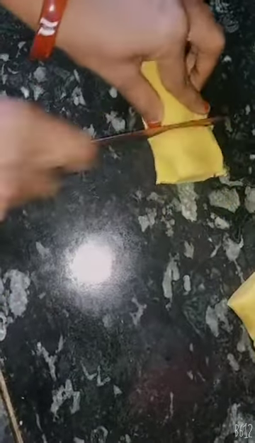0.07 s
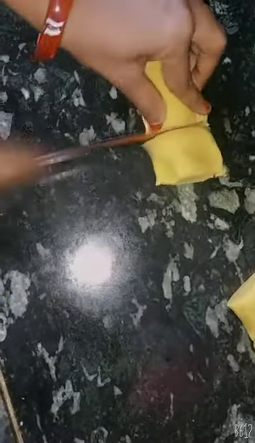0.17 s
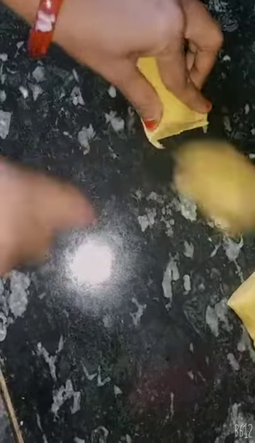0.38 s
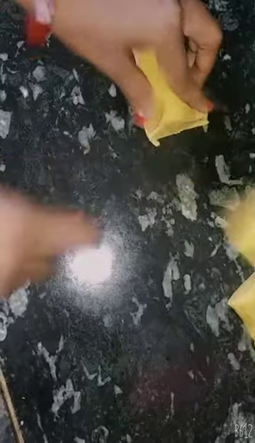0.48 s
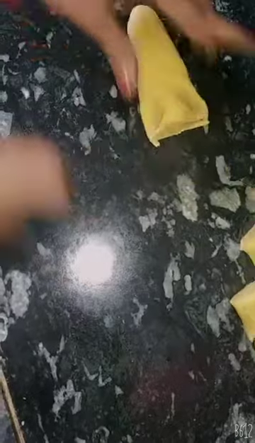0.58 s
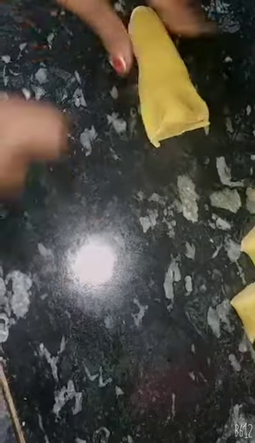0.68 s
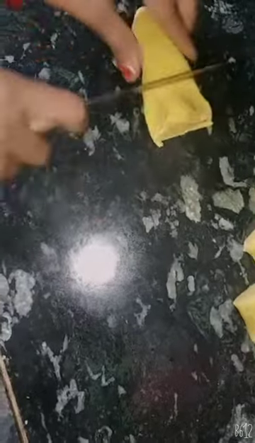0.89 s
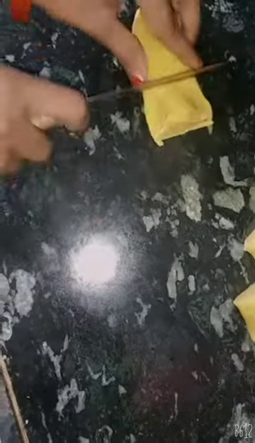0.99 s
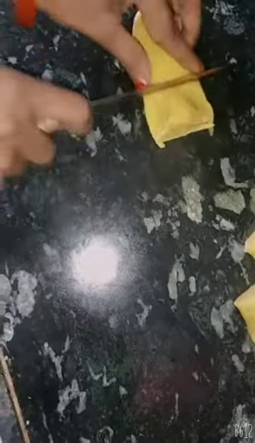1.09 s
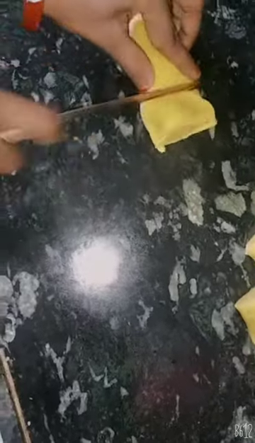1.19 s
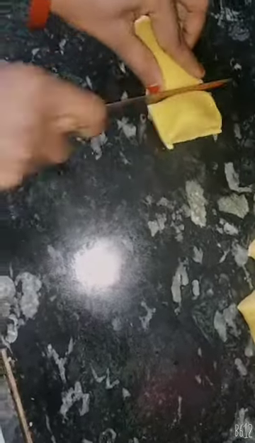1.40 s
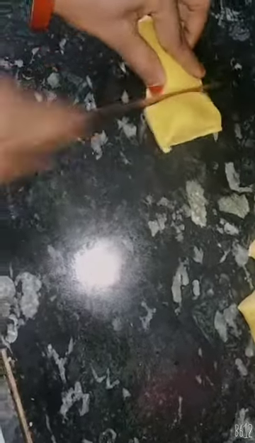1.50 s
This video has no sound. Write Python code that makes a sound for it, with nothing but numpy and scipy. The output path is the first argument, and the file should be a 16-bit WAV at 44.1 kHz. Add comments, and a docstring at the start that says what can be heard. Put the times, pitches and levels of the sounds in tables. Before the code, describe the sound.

A steel knife cutting dough scrapes hard across a stone countertop, ending in a brief squeak. After a dull bump, it scrapes lightly and ticks on the stone, close to the microphone in a small kitchen.

```python
"""Over a low, steady room noise, a steel knife cuts stiff dough on a stone countertop, close to a phone.
A faint slide dies away, then the edge is dragged hard over the stone, sticking and slipping in tiny jerks.
It ticks twice, squeals briefly with a soft knock, and rings as it lifts. A dull bump follows.
For the next cut it scrapes lightly to and fro and ticks down on the stone.
After each sound, the hard walls of the small kitchen ring on."""
import sys
import numpy as np
from scipy import signal
from scipy.fft import rfft, irfft
from scipy.io import wavfile

SR = 44100
rng = np.random.default_rng(int(sys.argv[2]) if len(sys.argv) > 2 else 0)


def store_wav(level_fs):
    """Save 16-bit WAV to argv[1]."""
    pcm = np.round(np.clip(np.atleast_2d(level_fs), -1, 1) * 32767)
    wavfile.write(sys.argv[1], SR, pcm.T.astype(np.int16))


N = 66150

# tone of the steady room noise (f/Hz, relative level/dB)
ROOM_NOISE_COLOUR = [(30, -37.5), (60, -37), (105, -28), (135, -18), (200, -5), (270, -3), (360, 0.5),
                     (460, -10.5), (550, -5.5), (680, -10.5), (790, -6), (1270, -13.5), (1640, -14),
                     (2200, -20.5), (5000, -24.5), (13800, -21)]
# light strokes (peak t/s, rise t/s, fall t/s, level/dB, treble tilt/dB per octave, treble top f/Hz)
LIGHT_STROKES = [(0.013, 0.18, 0.052, -45, -5, 14000), (1.015, .07, .12, -61.5, 6.5, 13640),
                 (1.169, 0.085, 0.015, -57, 7, 14100), (1.287, 0.028, 0.022, -36.5, 3.5, 10650),
                 (1.466, 0.057, 0.096, -43.5, 0.5, 13060)]
# tone of the edge sliding lightly (f/Hz, relative level/dB)
SLIDE_COLOUR = [(100, -48), (1000, -39.5), (2000, -26.5), (2650, -20), (3500, -15), (5000, -15),
                (6500, -9.5), (7900, -1.5), (9500, -2), (11000, -1.5), (12400, 0), (13800, -4)]
# the blade's natural tones (f/Hz, level/dB after the lift, t/s to fade by 60 dB)
BLADE_TONES = [(2115, -40.5, 0.076), (3560, -51.5, .08), (4935, -49.5, 0.18), (7630, -42.5, .15),
               (9592, -39.5, .17), (11170, -41, .17), (11630, -41.5, .12)]
# loudness of the hard stroke that parts the dough (t/s, level/dB)
DRAG_LEVELS = [(.10, -68.5), (.125, -55), (.16, -50.5), (.178, -39), (0.196, -26.5), (.206, -21),
               (.229, -18), (.242, -17), (.247, -22.5), (.251, -77)]
# tone of the edge pressed hard on stone (f/Hz, relative level/dB)
DRAG_COLOUR = [(60, -57.5), (150, -40), (400, -36.5), (900, -39), (1400, -26.5), (1850, -36.5),
               (2200, -25.5), (2650, -23), (3200, -24.5), (3700, -15.5), (5000, -19), (6400, -15.5),
               (7900, -8), (8900, -9.5), (11400, -2), (12400, -6), (13800, -6.5)]
# the edge taps the stone or catches on a grain (t/s, level/dB before colouring)
TICKS = [(0.188, -8), (0.2105, -7.5), (1.1808, -6.5), (1.1829, 5)]
# tone of a tick (f/Hz, level/dB)
TICK_COLOUR = [(60, -37.5), (400, -32), (1000, -39), (2000, -23), (2650, -21), (3500, -13.5), (4700, -20.5),
               (6300, -10), (8000, -2.5), (9300, -9), (10800, -2), (13800, -11)]
# blade tones that lock into a squeal (f/Hz, pitch wobble f/Hz, level/dB)
SQUEAL_TONES = [(4968, 300, -32), (9720, 190, -24.5), (10560, 110.7, -18), (11200, 160, -29),
                (11630, 120, -31.5)]
# soft knocks on the counter (t/s, f/Hz, level/dB, t/s to fade by 60 dB)
KNOCKS = [(0.2377, 1300, -41, .01), (0.758, 268.6, -48, 0.06)]
# how long the walls ring (f/Hz, t/s to fade by 60 dB)
WALL_RING_TIMES = [(500, 0.5), (2000, 0.41), (5000, 0.42), (8000, .35), (11000, 0.24), (14000, 0.17)]

SLIP_HZ, SLIP_JITTER = 956.8, .3  # typical slips per second, and how uneven they are
TOP_HZ = 13900  # upper limit of the treble


def undb(db):
    """Turn decibels into a number to multiply by."""
    return 10 ** (np.asarray(db) / 20)


def unit(x):
    """Scale a signal to an average (rms) strength of 1."""
    return x / np.sqrt(np.mean(x ** 2))


def clock():
    """Time of each sample in seconds."""
    return np.arange(N) / SR


def fade(start, t60):
    """Silence until the start, then a fall of 60 dB every t60 seconds."""
    age = clock() - start
    return (age >= 0) * np.exp(-np.log(1000) * np.maximum(age, 0) / t60)


def on_log_axis(hz, points):
    """Read between (f/Hz, value) points, with every octave equally wide."""
    f, v = np.array(points, float).T
    return np.interp(np.log(np.maximum(hz, 1)), np.log(f), v)


def colour(x, points, size=4096):
    """Turn low and high pitches up or down along a curve of (f/Hz, level/dB) points."""
    gain = undb(on_log_axis(np.fft.rfftfreq(size, 1 / SR), points))
    cepstrum = irfft(np.log(gain))
    cepstrum[1:size // 2] *= 2  # fold it so the filter never answers before its input
    cepstrum[size // 2 + 1:] = 0
    return signal.fftconvolve(x, irfft(np.exp(rfft(cepstrum))))[:N]


def wander(rate_hz):
    """A smooth random wobble, about 1 in size."""
    return unit(np.interp(clock() * rate_hz, np.arange(N), rng.standard_normal(N)))


def ring(start, hz, db, t60):
    """One pure tone that dies away."""
    return undb(db) * fade(start, t60) * np.sin(2 * np.pi * hz * (clock() - start))


def room_noise(level_db=-62):
    """A low, steady hush fills the room."""
    return undb(level_db) * unit(colour(rng.standard_normal(N), ROOM_NOISE_COLOUR))


def friction(points, count=4000, grit_s=.0009, grit_db=9.5, held_width_hz=70, held_db=-4.5):
    """The edge sticks and slips; each slip is a click and a puff of gritty noise that shake the blade."""
    gap, size = rng.standard_normal((count, 2)).T
    at = (np.cumsum(np.exp(SLIP_JITTER * gap)) / SLIP_HZ * SR).astype(int)
    strength = undb(.5 * np.clip(size, -2, 2))
    slips = np.bincount(at[at < N], strength[at < N], N)
    puffs = signal.lfilter([1], [1, -np.exp(-1 / (grit_s * SR))], slips)
    grit = puffs * rng.standard_normal(N)
    chatter = undb(.65 * wander(rate_hz=216.4))
    force = (unit(slips - slips.mean()) + undb(grit_db) * unit(grit)) * chatter
    # the dough damps the blade's tones while the edge slides
    steel = sum(signal.lfilter(*signal.iirpeak(hz, hz / held_width_hz, SR), force)
                for hz, _, _ in BLADE_TONES)
    return unit(colour(force + undb(held_db) * steel, points))


def light_strokes(swell_db=20.5, top_fall_db_per_octave=42):
    """The edge slides lightly over the stone in short scrapes that swell and die away."""
    hz, levels = np.array(SLIDE_COLOUR).T
    out = 0
    for peak_s, rise, fall, db, tilt_db, top_hz in LIGHT_STROKES:
        from_peak = np.maximum((peak_s - clock()) / rise, (clock() - peak_s) / fall)
        octaves = np.log2(hz / top_hz)
        tilted = levels + tilt_db * octaves - top_fall_db_per_octave * np.maximum(octaves, 0)
        out = out + friction(list(zip(hz, tilted))) * undb(db - swell_db * from_peak)
    return out


def hard_stroke():
    """The edge bites harder and harder into the stone, then leaves it."""
    times, db = np.array(DRAG_LEVELS).T
    return friction(DRAG_COLOUR) * undb(np.interp(clock(), times, db, left=-np.inf, right=-np.inf))


def ticks(spread_s=.0008875, rattle_db=-2):
    """Each tap cracks and rattles briefly; the bending blade carries the crack's treble fastest."""
    hz, out = np.fft.rfftfreq(N, 1 / SR), 0
    for start, db in TICKS:
        arrival = start + spread_s * (1 - hz / TOP_HZ)
        crack = irfft(np.exp(-2j * np.pi * np.cumsum(arrival) * SR / N), N)
        rattle = unit(rng.standard_normal(N) * fade(start, t60=.019)) / np.sqrt(N)
        out = out + undb(db) * (crack + undb(rattle_db) * rattle)
    return colour(out, TICK_COLOUR)


def squeal(full_s=.2365, rise_s=.005, hold_s=.0075, fall_s=.003):
    """Rubbing makes the blade sing for a moment, throbbing at the pace of the slips."""
    grip = np.interp(clock() - full_s, [-rise_s, 0, hold_s, hold_s + fall_s], [0, 1, 1, 0])
    slip_rate = SLIP_HZ * (1 + SLIP_JITTER * wander(SLIP_HZ))
    throb = 1 + .45 * np.sin(2 * np.pi * np.cumsum(slip_rate) / SR)
    tones = 0
    for hz, wobble_hz, db in SQUEAL_TONES:
        pitch = hz + wobble_hz * wander(SLIP_HZ)
        tones = tones + undb(db) * unit(np.sin(2 * np.pi * np.cumsum(pitch) / SR))
    return grip * throb * tones


def knocks(rise_s=.005):
    """Blade, hand and dough land on the counter with dull, cushioned bumps."""
    return sum(ring(start, hz, db, t60) * np.clip((clock() - start) / rise_s, 0, 1)
               for start, hz, db, t60 in KNOCKS)


def blade_ring(lift_s=.246):
    """Lifted off the stone, the blade rings freely."""
    return sum(ring(lift_s, *tone) for tone in BLADE_TONES)


def kitchen(x, bands=12, delay_s=.0067, near_db=-8.5, walls_db=-5):
    """Nearby surfaces echo briefly and the walls ring on, with the treble dying soonest."""
    noise, hz = rfft(rng.standard_normal(N)), np.fft.rfftfreq(N, 1 / SR)
    band = np.minimum((hz / TOP_HZ * bands).astype(int), bands - 1)
    walls = 0
    for k in range(bands):
        t60 = on_log_axis((k + .5) * TOP_HZ / bands, WALL_RING_TIMES)
        walls = walls + irfft(noise * (band == k), N) * fade(delay_s, t60)
    near = rng.standard_normal(N) * fade(delay_s, t60=.07)
    echo = (undb(walls_db) * unit(walls) + undb(near_db) * unit(near)) / np.sqrt(N)
    return x + signal.fftconvolve(x, echo)[:N]


def scene(dip_hz=2640):
    """Knife and counter echo in the kitchen, with a narrow dip in their tone, over the room noise."""
    knife = light_strokes() + hard_stroke() + ticks() + squeal() + knocks() + blade_ring()
    hollowed = signal.lfilter(*signal.iirnotch(dip_hz, Q=5.5, fs=SR), kitchen(knife))
    return (hollowed + room_noise())[None]


def record(dry, low_cut_hz=85):
    """The phone thins the bass and cuts off the highest treble steeply."""
    thin = signal.sosfilt(signal.butter(2, low_cut_hz, "high", fs=SR, output="sos"), dry)
    return signal.sosfilt(signal.ellip(12, .2, 80, TOP_HZ, fs=SR, output="sos"), thin)


dry = scene()
out = record(dry)
store_wav(out)
```